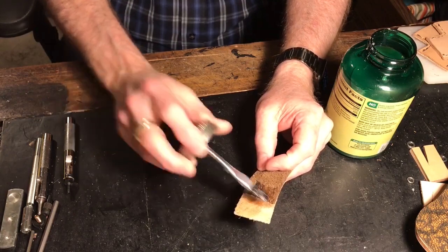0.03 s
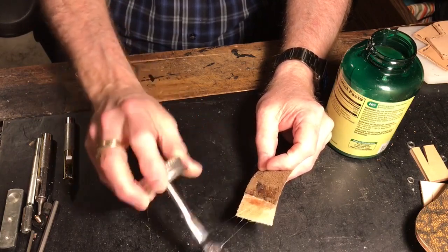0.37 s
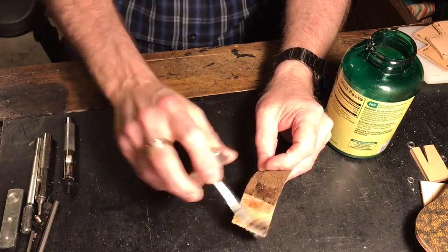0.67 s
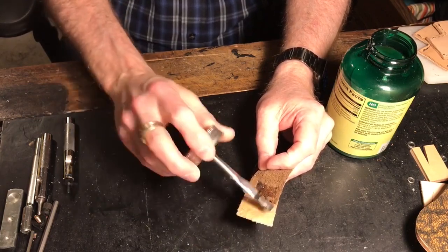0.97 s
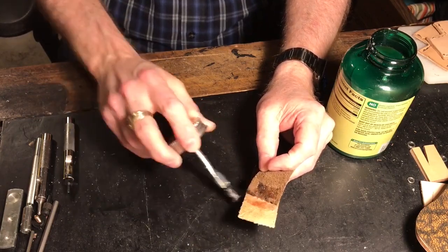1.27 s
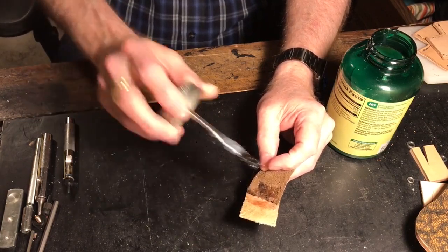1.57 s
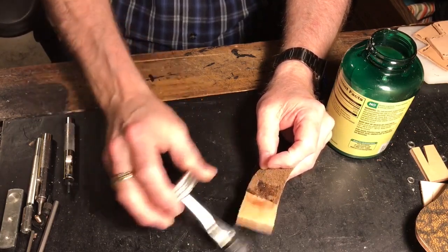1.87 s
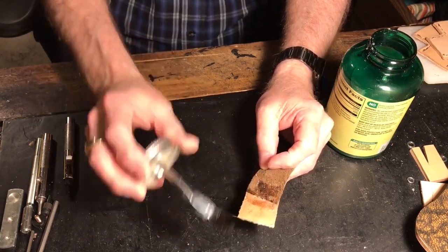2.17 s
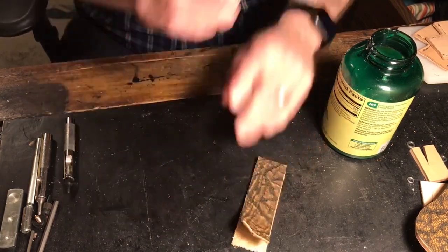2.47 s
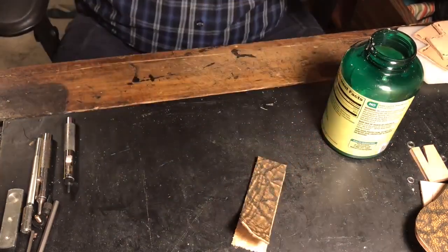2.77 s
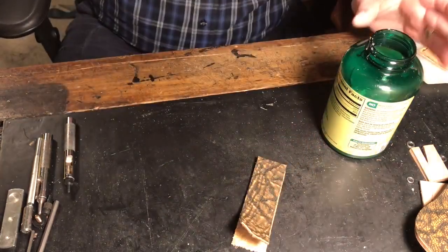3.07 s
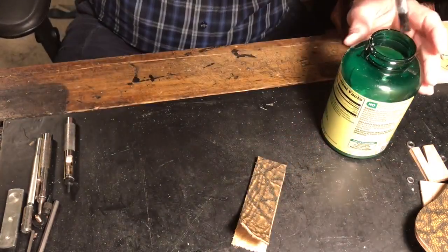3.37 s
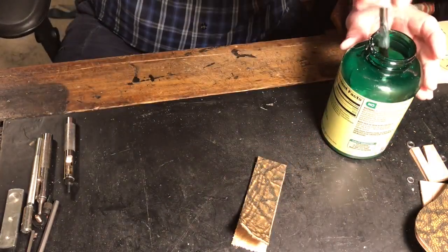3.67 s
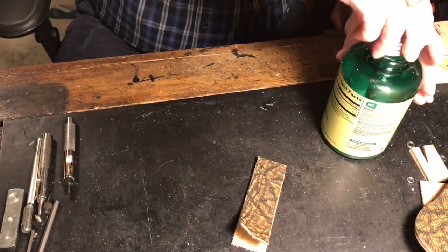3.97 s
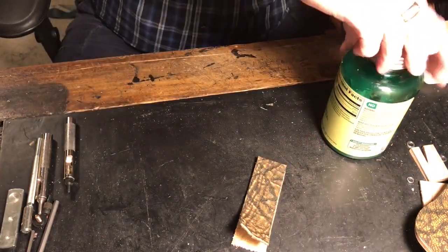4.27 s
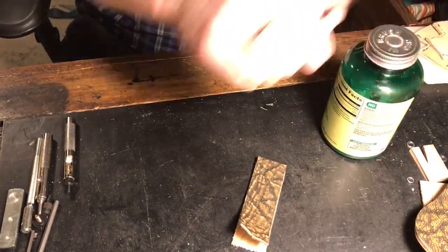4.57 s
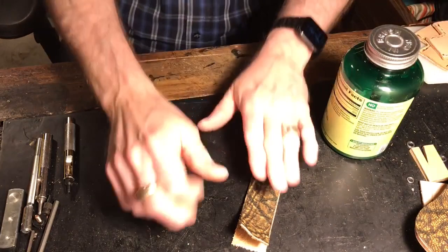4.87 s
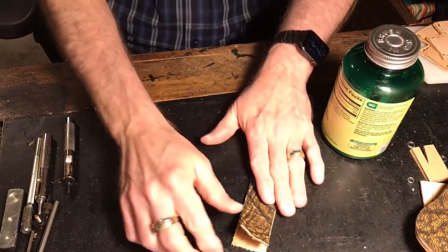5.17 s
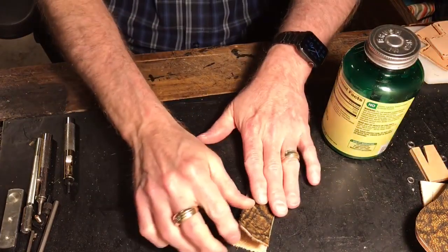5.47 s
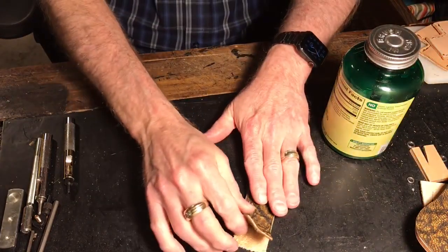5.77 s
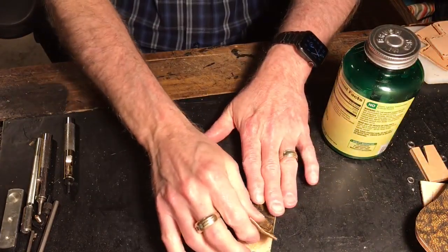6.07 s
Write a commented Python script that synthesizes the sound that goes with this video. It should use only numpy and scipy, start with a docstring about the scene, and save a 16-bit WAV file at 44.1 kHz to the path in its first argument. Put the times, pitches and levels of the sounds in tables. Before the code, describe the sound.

A brush crackles softly through glue before its stem scrapes a bottle neck and the metal lid clacks sharply into place.

```python
"""Sticky bristles crackle as glue is brushed onto leather in a quiet, humming workshop.
Glue threads snap, sleeves shift, hands bump the bench. The brush goes back in, its stem scraping the
bottle's neck. The metal cap, the loudest sound, clacks onto the rim and rings the air inside,
then snaps over the thread as it is turned. Last, hands brush together and smooth the leather."""
import sys
import numpy as np
from scipy import signal
from scipy.fft import rfft, irfft
from scipy.io import wavfile
from scipy.ndimage import uniform_filter1d

SR = 44100
rng = np.random.default_rng(int(sys.argv[2]) if len(sys.argv) > 2 else 0)


def pcm_store(signal):
    """Save signal as 16-bit PCM."""
    levels = np.round(np.clip(np.atleast_2d(signal), -1, 1) * 32767)
    wavfile.write(sys.argv[1], SR, levels.astype(np.int16).T)


N = 270316
TIME_S = np.arange(N) / SR
RING_S = np.arange(SR // 2) / SR  # time axis of one impact

# Metal cap. Each row: mode in Hz, level loose in dB, level seated in dB, t60 in seconds.
CAP_MODES = [(1080, -19.5, -17, 0.05), (1253, -14, -19.5, .04), (1481.4, -20.5, -15.5, .06),
             (1877, -8, -21, 0.059), (1958, -17.5, -9.5, 0.058), (2537, -18.5, -3.5, .05),
             (2770, -15, -13.5, .05), (2920, -9.5, -13.5, 0.0604), (2950, -11.5, -13.5, .06),
             (3082, -9, -15, 0.11), (3351, -9.5, -22, 0.093), (3420, -12.5, -25, .09),
             (3850, -1.5, -15.5, 0.061), (4002, -8.5, -19, 0.074), (4420, -19, -27.5, 0.08),
             (4670, -14, -24.5, .06), (5155, -15, -16.5, .05), (5240, -9, -5.5, 0.066),
             (5520, -13, -12, 0.047), (5607, -14.5, -10, .04), (6470, -14, -6.5, 0.031),
             (6946, -16.5, -9, .04), (9630, -26, -14, 0.032)]
# Air in the bottle, its wall, stem on neck, bench. Each row: mode in Hz, level in dB, t60 in seconds.
CAVITY_MODES = [(331.6, -2.5, 0.18)]
WALL_MODES = [(509, -2, 0.033), (608, -4, 0.028)]
NECK_MODES = [(600.7, -1.5, 0.011), (1030, 1, 0.018), (1180, -1.5, .025), (1722, -3.5, 0.01612),
              (1890, -9.5, 0.023), (2209, -14.5, 0.046), (2400, -9.5, .04), (2640, -5, 0.026),
              (4130, -8.5, 0.017), (4430, -9.5, .03), (5310, -14.5, .02), (5650, -12.5, .02),
              (6290, -15, 0.039), (6860, -15, 0.054)]
BENCH_MODES = [(136.7, -12, .08), (236.5, 0, 0.034), (293, -14, 0.12)]
# Rubbing on the bottle. Each row: frequency in Hz, relative density in dB.
RUB_SPECTRUM = [(100, -25), (500, 4.5), (850, -7), (1300, -2.5), (1900, 5.5), (3000, -4), (4700, -13),
                (6000, -5.5), (7500, -18.5), (10500, -19.5), (15000, -18.5)]


def amp(db):
    return 10 ** (np.asarray(db) / 20)


def unit_rms(x):
    return x / np.sqrt(np.mean(x ** 2) + 1e-20)


def curve_at(points, hz):
    """Interpolates (Hz, value) points over log frequency."""
    point_hz, value = np.transpose(points)
    return np.interp(np.log(hz + 1), np.log(point_hz + 1), value)


def add(mix, start_s, sound):
    part = mix[round(start_s * SR):][:len(sound)]
    part += sound[:len(part)]


def colour(x, spectrum):
    """Filters x by (Hz, dB) points; rms 1."""
    gain = amp(curve_at(spectrum, np.fft.rfftfreq(len(x), 1 / SR)))
    return unit_rms(irfft(rfft(x) * gain, len(x)))


def ring(modes):
    """Decaying sines of alternating sign from (Hz, dB, t60 s) rows."""
    return sum((-1) ** k * amp(db) * 1000 ** (-RING_S / t60_s) * np.sin(2 * np.pi * hz * RING_S)
               for k, (hz, db, t60_s) in enumerate(modes))


def excite(force, modes):
    """Modes driven by a continuous force; rms 1."""
    return unit_rms(signal.fftconvolve(force, ring(modes))[:N])


def resonate(x, hz, width_hz):
    """Steep resonance following the curve hz; rms 1."""
    carrier = np.exp(2j * np.pi * np.cumsum(hz) / SR)
    pole = np.exp(-np.pi * width_hz / SR)
    baseband = signal.lfilter([1], [1, -2 * pole, pole ** 2], x / carrier)
    return unit_rms((carrier * baseband).real)


def burst(spectrum, t60_s, contact_s=0):
    """Unresolved modes decaying together; long contact softens the onset."""
    attack = 1 - np.exp(-RING_S / max(contact_s, 1 / SR))
    decay = np.exp(-RING_S / (t60_s / np.log(1000) + contact_s))
    return colour(rng.standard_normal(len(RING_S)), spectrum) * attack * decay


def snap(centre_hz, width_octaves, t60_s):
    """Short burst in one band."""
    hz = np.geomspace(100, 20000, 60)
    band_db = -20 * np.log10(1 + (np.log2(hz / centre_hz) / width_octaves) ** 2)
    return burst(np.c_[hz, band_db], t60_s)


def friction(slips_per_s, spread_db, hiss, clump_db=2, clump_s=0.0092):
    """Uneven micro-slips over hiss, bunching as the surface catches and lets go."""
    size = amp(spread_db * np.minimum(rng.exponential(1, N), 4))
    slips = size * (rng.random(N) < slips_per_s / SR) * rng.choice([-1, 1], N)
    grip = unit_rms(uniform_filter1d(rng.standard_normal(N), round(clump_s * SR)))
    return unit_rms((unit_rms(slips) + hiss * rng.standard_normal(N)) * amp(clump_db * grip))


def strokes(rows, peak_at, sharpness):
    """Envelope from (start s, length s, dB) rows; the hand is fastest at fraction peak_at."""
    envelope = np.zeros(N)
    skew = np.log(0.5) / np.log(peak_at)
    for start_s, length_s, db in rows:
        progress = np.arange(0, length_s, 1 / SR) / length_s
        add(envelope, start_s, amp(db) * abs(np.sin(np.pi * progress ** skew)) ** sharpness)
    return envelope


def background(air_db=-53):
    """Ventilation rumble and hiss, with mains and fan hum."""
    # Room air. Each row: frequency in Hz, relative density in dB.
    air_spectrum = [(20, -29.5), (40, -5.5), (62, 4), (90, -2.5), (170, -6), (280, -11), (450, -18),
                    (900, -20.5), (1400, -26.5), (3000, -30), (7500, -34.5), (12500, -33), (16000, -36.5)]
    # Mains and fan. Each row: frequency in Hz, rms level in dB.
    hum_tones = [(59.8, -55.5), (119.8, -58), (850, -76.5)]
    hum = sum(amp(db) * np.sqrt(2) * np.sin(2 * np.pi * (hz * TIME_S + rng.random()))
              for hz, db in hum_tones)
    return amp(air_db) * colour(rng.standard_normal(N), air_spectrum) + hum


def room(x, wet_db=-11, first_s=0.0026, build_s=0.0066, echoes_per_s=4000):
    """Adds dense reflections that build up, then decay band by band."""
    # Reverberation. Each row: frequency in Hz, t60 in seconds.
    decay_times = [(150, 0.47), (500, .22), (1500, 0.22), (4000, 0.22), (8000, 0.15), (14000, 0.23)]
    build = np.clip((RING_S - first_s) / build_s, 0, 1)
    echoes = rng.standard_normal(len(RING_S)) * (rng.random(len(RING_S)) < echoes_per_s / SR) * build
    hz, age_s, bands = signal.stft(echoes, SR, nperseg=256)
    decay = 1000 ** (-age_s / curve_at(decay_times, hz)[:, None])
    tail = signal.istft(bands * decay, SR, nperseg=256)[1]
    tone_db = curve_at([(300, -8), (1500, 0), (5500, 0), (10000, -4)], np.fft.rfftfreq(len(tail), 1 / SR))
    tail = irfft(rfft(tail / np.linalg.norm(tail)) * amp(tone_db))
    return x + amp(wet_db) * signal.fftconvolve(x, tail)[:N]


def sleeves(rest_db=-71):
    """Shirt cloth slides smoothly, swelling as the arms shift."""
    # Arm moves. Each row: start in seconds, length in seconds, level in dB.
    moves = [(1.68, 0.3, -65.5), (2.25, 0.72, -59.5), (4.5, 1.66, -69)]
    # Cloth. Each row: frequency in Hz, relative density in dB.
    cloth_spectrum = [(80, -17.5), (160, -7.5), (280, 5.5), (450, -9), (1150, -18.5), (1600, -10.5),
                      (2300, -24), (4000, -21), (12000, -39)]
    envelope = amp(rest_db) + strokes(moves, peak_at=0.41, sharpness=1.6)
    return envelope * colour(rng.standard_normal(N), cloth_spectrum)


def hand_rubs():
    """Skin slides on skin and leather: fine slips, mostly hiss."""
    # Rubs. Each row: start in seconds, length in seconds, level in dB.
    rubs = [(4.59, 0.32, -57.5), (4.675, 0.069, -62), (4.755, .04, -56.5), (4.845, 0.047, -59.5),
            (5.74, 0.35, -62.5)]
    # Skin friction. Each row: frequency in Hz, relative density in dB.
    skin_spectrum = [(880, -40), (1500, -12), (2060, -21), (2580, -3), (4990, -6), (7180, 0), (8170, -5.5),
                     (13600, 1), (15800, -2)]
    slips = friction(slips_per_s=2500, spread_db=4.5, hiss=1.6)
    return strokes(rubs, peak_at=0.46, sharpness=1.26) * colour(slips, skin_spectrum)


def bench_bumps():
    """The soft side of a hand lands and rubs, driving the bench's low modes."""
    # Bumps. Each row: start in seconds, length in seconds, level in dB.
    bumps = [(1.82, .08, -54), (1.965, .05, -56), (2.352, .075, -49.5), (2.575, .075, -53)]
    return strokes(bumps, peak_at=0.42, sharpness=1.1) * excite(rng.standard_normal(N), BENCH_MODES)


def brush():
    """Sticky bristles catch and slip on the leather."""
    # Brush strokes. Each row: start in seconds, length in seconds, level in dB.
    passes = [(.118, 0.17, -53.5), (.618, 0.17, -53), (.87, 0.17, -65), (1.055, 0.056, -61),
              (1.185, 0.16, -57), (1.83, 0.087, -51.5), (2.285, 0.07, -56.5), (2.381, 0.059, -52.5)]
    # Bristle friction. Each row: frequency in Hz, relative density in dB.
    bristle_spectrum = [(590, -27), (1000, -2), (1320, -7), (2020, -7.5), (2240, -4), (2830, -7),
                        (4490, 0.5), (7810, -6), (10200, -7), (11600, -1.5), (15800, -3.5)]
    slips = friction(slips_per_s=910, spread_db=2, hiss=0.86)
    return strokes(passes, peak_at=0.31, sharpness=1.1) * colour(slips, bristle_spectrum)


def glue_snaps_and_touches():
    """Glue threads snap in a wide band; bristles, stem and fingers tick in a narrow one."""
    # Snaps and touches. Each row: time in seconds, level in dB, centre in Hz.
    threads = [(.1285, -47.5, 4900), (.172, -53, 4000), (.249, -50.5, 6000), (0.458, -55, 4970),
               (0.632, -51, 5500), (0.671, -45, 3700), (.692, -46, 9000), (.751, -51.5, 4500),
               (1.3, -47, 3500), (1.3044, -42, 3180), (1.869, -47, 8500), (1.908, -47, 4000),
               (2.2608, -53, 10000)]
    touches = [(1.1388, -53, 5500), (1.849, -47, 5470), (2.39, -50, 4800), (3.827, -40, 12500),
               (5.104, -57, 3600), (5.3372, -45.5, 4240)]
    out = np.zeros(N)
    for start_s, db, centre_hz in threads:
        add(out, start_s, amp(db) * snap(centre_hz, width_octaves=1.4, t60_s=0.027))
    for start_s, db, centre_hz in touches:
        add(out, start_s, amp(db) * snap(centre_hz, width_octaves=0.17, t60_s=0.016))
    return out


def stem_knocks(neck_db=-3):
    """The brush stem clicks against the neck and rings it."""
    # Knocks. Each row: time in seconds, level in dB.
    knocks = [(3.647, -47), (3.7705, -46), (3.8, -51), (3.827, -50), (3.8913, -56)]
    out = np.zeros(N)
    for start_s, db in knocks:
        click = snap(centre_hz=4500, width_octaves=1.8, t60_s=0.033)
        add(out, start_s, amp(db) * (click + amp(neck_db) * ring(NECK_MODES)))
    return out


def stem_scrape(slips, start_s=3.644, length_s=0.24, level_db=-48.5, fade_db_per_s=-50):
    """The stem catches on the neck, drags ever more lightly and comes free; its note sinks with depth."""
    attack_s, release_s = 0.005, 0.06
    note_hz, glide_octaves_per_s = 1144, -7
    age_s = np.clip(TIME_S - start_s, 0, length_s)
    gate = np.minimum(age_s / attack_s, (length_s - age_s) / release_s).clip(max=1)
    note = resonate(slips, note_hz * 2 ** (glide_octaves_per_s * age_s), width_hz=260)
    neck = excite(slips, NECK_MODES)
    rub = colour(slips, RUB_SPECTRUM)
    return gate * amp(level_db + fade_db_per_s * age_s) * (amp(-2) * neck + amp(-3) * rub + amp(-5) * note)


def cap_slides(slips, cap_db=-9, bottle_db=-1):
    """The loose cap rubs round the rim, driving its own modes and the bottle's air and wall."""
    # Slides. Each row: start in seconds, length in seconds, level in dB.
    slides = [(3.888, .04, -56), (4.02, .068, -40)]
    cap = excite(slips, [(hz, loose_db, t60_s) for hz, loose_db, _, t60_s in CAP_MODES])
    bottle = excite(slips, CAVITY_MODES + WALL_MODES)
    scrape = colour(slips, RUB_SPECTRUM) + amp(cap_db) * cap + amp(bottle_db) * bottle
    return strokes(slides, peak_at=0.48, sharpness=1.3) * scrape


def cap_blows(full_contact_s=0.0001, pivot_hz=4000, bench_delay_s=0.0015):
    """Each blow cracks and rings cap, bottle and bench; a seated cap dies sooner and drives the bench."""
    # Cap on bottle. Each row: time in seconds, strength in dB, tilt in dB per octave,
    # seating from 0 (loose) to 1 (on the thread), weight behind the blow in dB.
    blows = [(3.9150, -1, 0, 0.16, -15.5), (3.9217, -5.5, -0.9, .02, -12.5), (3.9244, -10, -3, 0.13, -9.5),
             (4.047, -48, 0.5, 0, -31), (4.177, -8, -1.5, 0.7, -11.5), (4.1964, -5, 0, 0.95, -12.5),
             (4.2106, -10.5, 2.5, 1, -35), (4.2117, -11.5, -6, 0.98, -8), (4.331, -40, -8.5, 0.97, -30)]
    # Contact crack. Each row: frequency in Hz, relative density loose in dB, the same seated in dB.
    crack_spectra = [(24.97, -55, -55), (404, -16, -13.5), (619.3, -4.5, -6.5), (770, -17.5, -14),
                     (930, -28.5, -15.5), (1230, -0.5, -2.5), (2210, -11.5, -4), (2900, 0.5, 4),
                     (4314, 1.5, -10), (5590, -0.5, 1.5), (6970, -11.5, 2), (7700, -14, -8.5),
                     (9200, -19.5, -6), (13470, -24.5, -13)]
    out = np.zeros(N)
    for start_s, db, tilt_db_per_octave, seating, weight_db in blows:
        def blend(loose, seated):
            return loose + seating * (seated - loose)

        def tilt_db(hz):
            return tilt_db_per_octave * np.log2(hz / pivot_hz)

        contact_s = full_contact_s / amp(db) ** (2 / 3)  # weaker blows stay in contact longer
        spectrum = [(hz, blend(loose, seated) + tilt_db(hz)) for hz, loose, seated in crack_spectra]
        crack = burst(spectrum, blend(0.024, 0.012), contact_s)
        cap = ring([(hz, blend(loose, seated) + tilt_db(hz), t60_s * blend(0.93, 0.75))
                    for hz, loose, seated, t60_s in CAP_MODES])
        bottle = ring(CAVITY_MODES) + ring(WALL_MODES)
        add(out, start_s, amp(db) * (crack + amp(blend(-5.5, -12.5)) * cap))
        add(out, start_s, amp(weight_db + blend(0, -19)) * bottle)
        add(out, start_s + bench_delay_s, amp(weight_db + blend(-28, 0)) * ring(BENCH_MODES))
    # small bodies radiate no deep bass
    return signal.sosfilt(signal.butter(2, 110, "highpass", fs=SR, output="sos"), out)


def scene():
    """Bottle and bench work in the room, over the background; mono."""
    clacks = cap_blows()
    neck_slips = friction(slips_per_s=720, spread_db=1.5, hiss=0.5)
    scrapes = stem_scrape(neck_slips) + cap_slides(neck_slips)
    ticks = glue_snaps_and_touches() + stem_knocks()
    handling = brush() + hand_rubs() + sleeves() + bench_bumps()
    return (room(clacks + scrapes + ticks + handling) + background())[None]


def record(dry, port_hz=10500, port_width_hz=600, port_db=-6, cutoff_hz=15850):
    """Microphone port notch, soft overload on the loudest clack, then a low-pass."""
    hz = np.fft.rfftfreq(N, 1 / SR)
    notch_db = port_db * np.exp(-((hz - port_hz) / port_width_hz) ** 2)
    notched = irfft(rfft(dry) * amp(notch_db), N)
    clipped = notched / (1 + notched ** 6) ** (1 / 6)
    lowpass = signal.firwin(511, cutoff_hz, window=("kaiser", 9), fs=SR)
    return signal.oaconvolve(clipped, lowpass[None], "same")


dry = scene()
out = record(dry)
pcm_store(out)
```